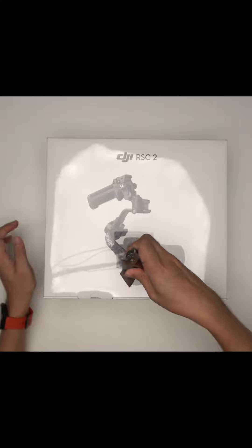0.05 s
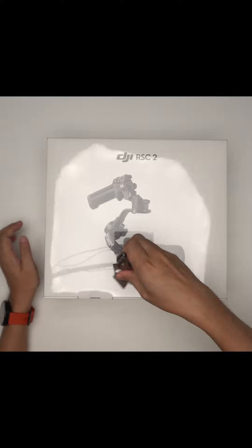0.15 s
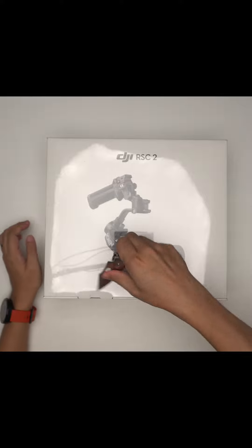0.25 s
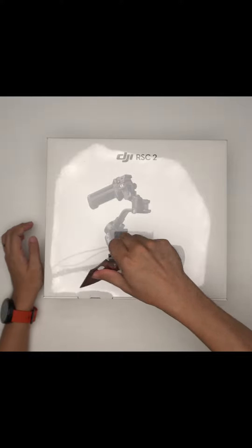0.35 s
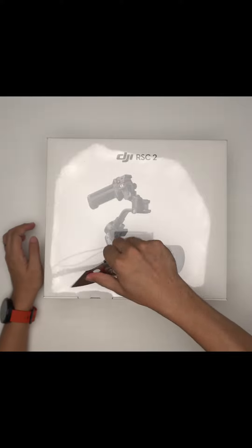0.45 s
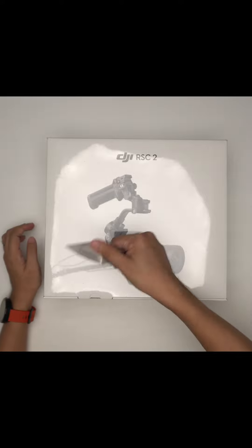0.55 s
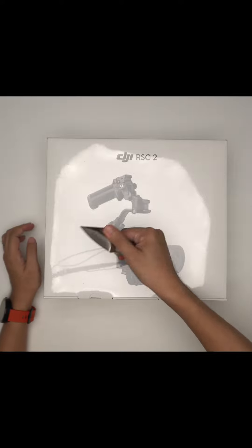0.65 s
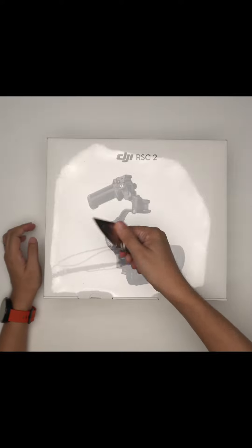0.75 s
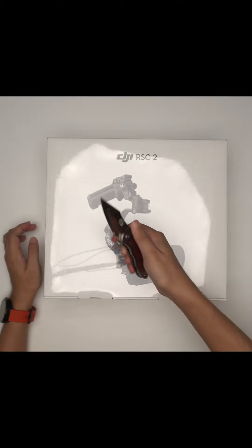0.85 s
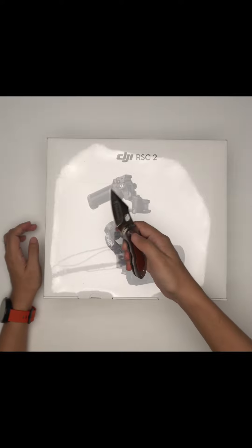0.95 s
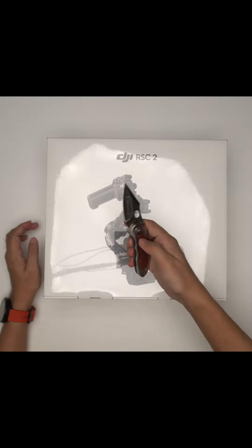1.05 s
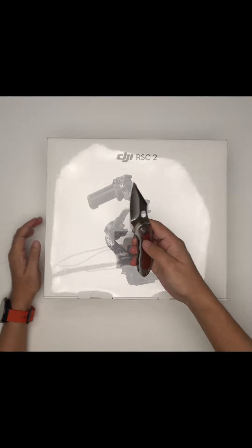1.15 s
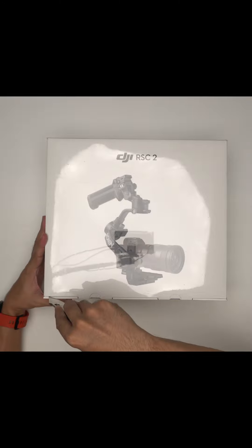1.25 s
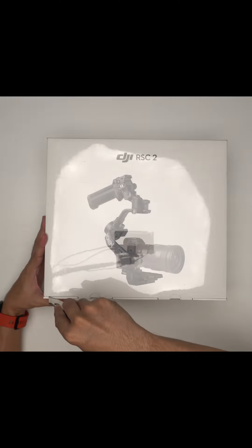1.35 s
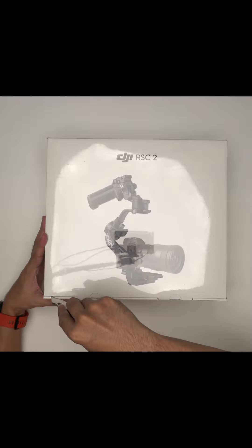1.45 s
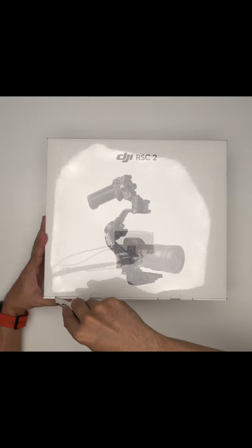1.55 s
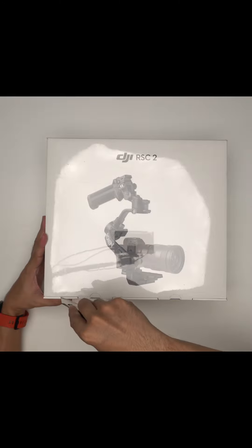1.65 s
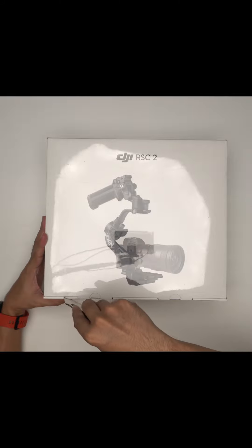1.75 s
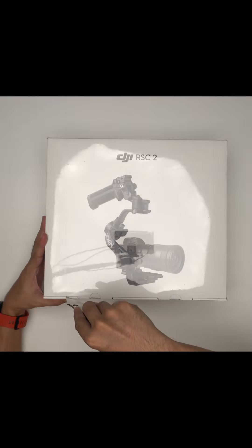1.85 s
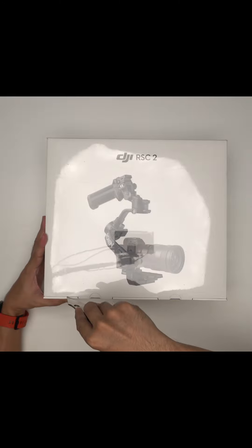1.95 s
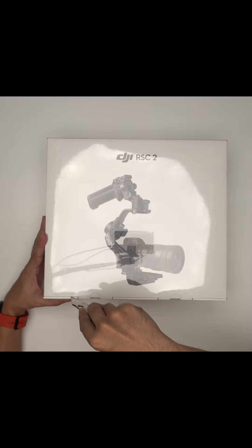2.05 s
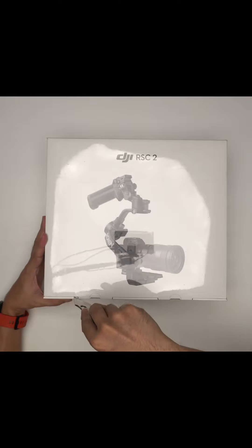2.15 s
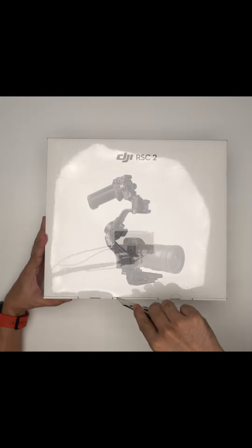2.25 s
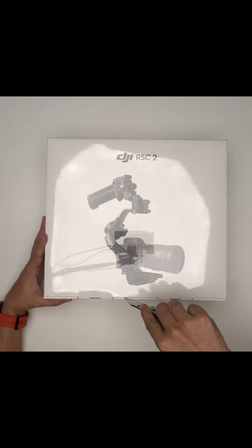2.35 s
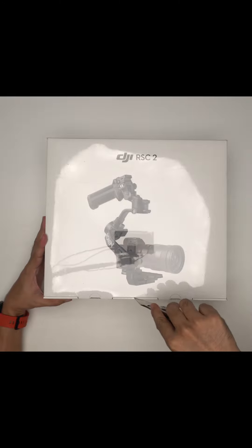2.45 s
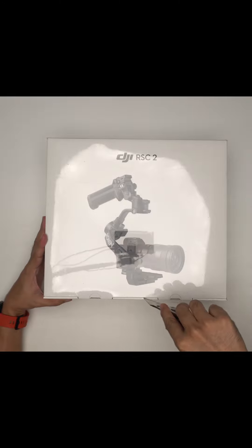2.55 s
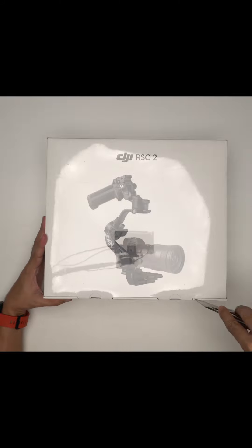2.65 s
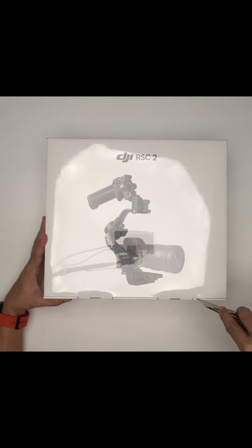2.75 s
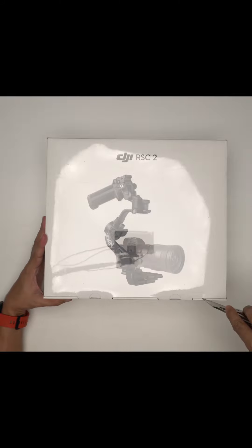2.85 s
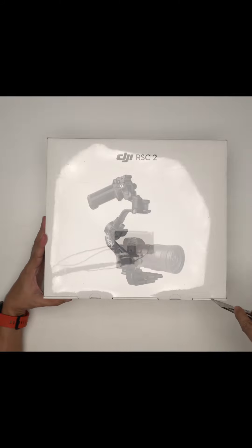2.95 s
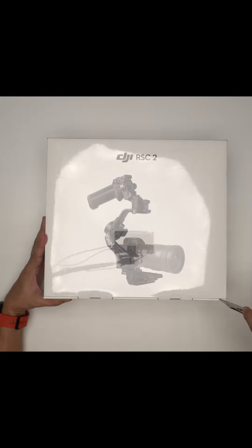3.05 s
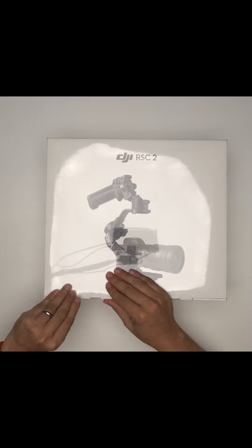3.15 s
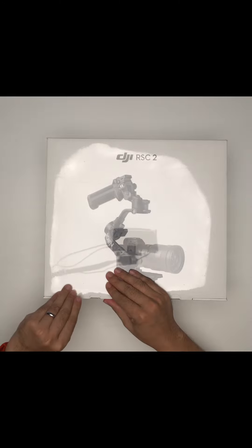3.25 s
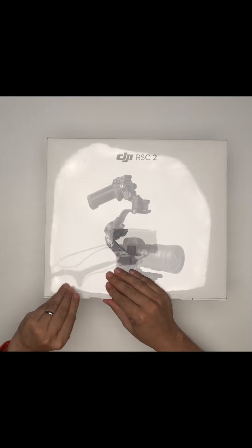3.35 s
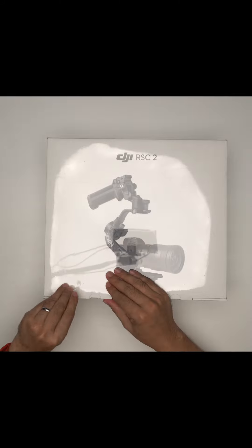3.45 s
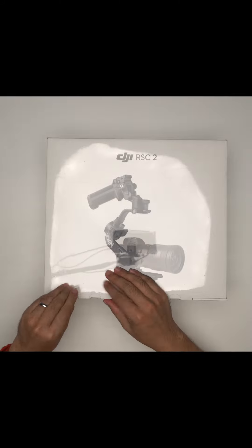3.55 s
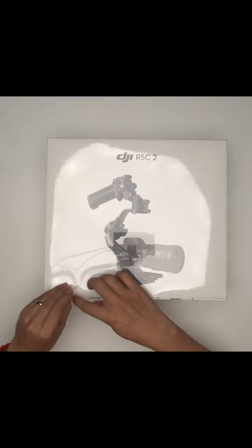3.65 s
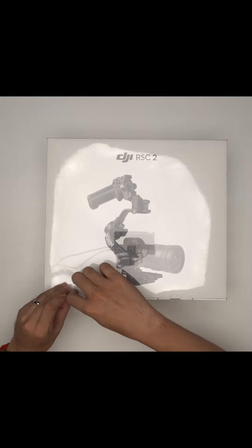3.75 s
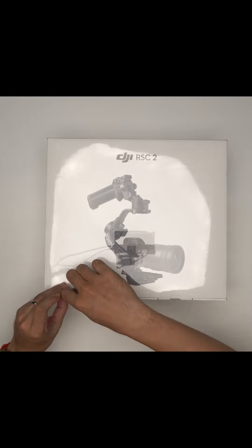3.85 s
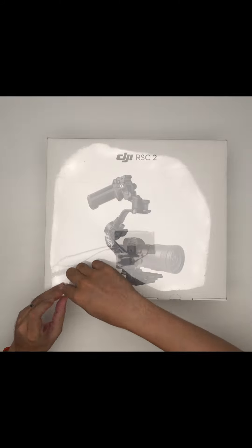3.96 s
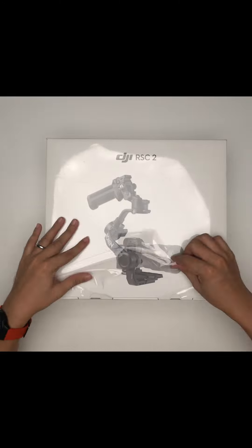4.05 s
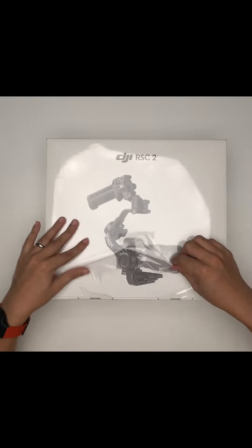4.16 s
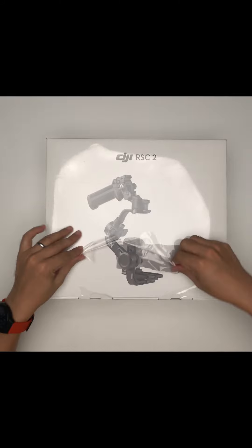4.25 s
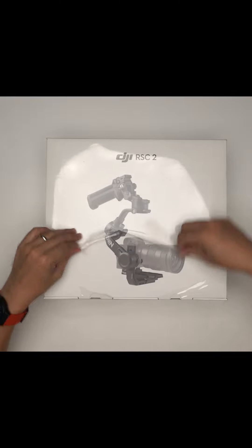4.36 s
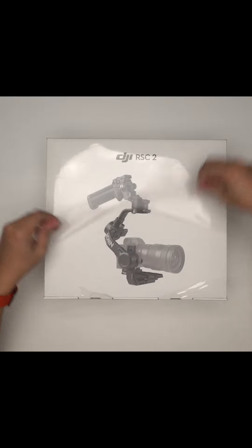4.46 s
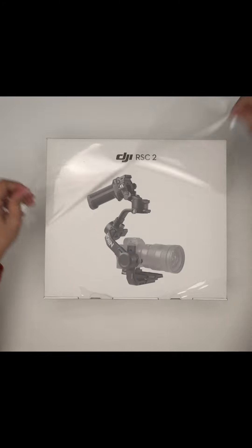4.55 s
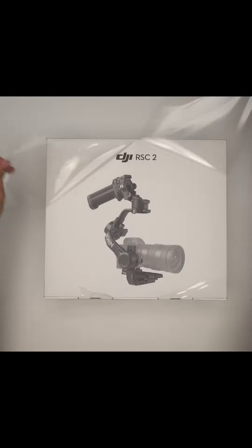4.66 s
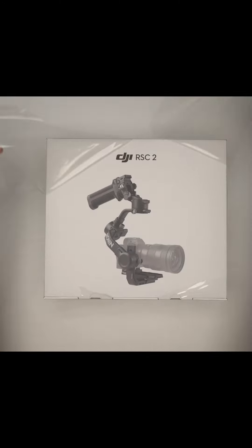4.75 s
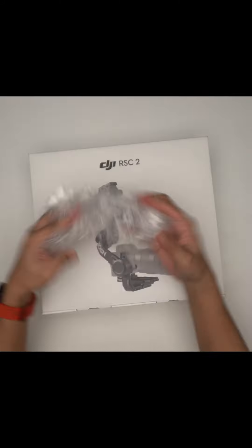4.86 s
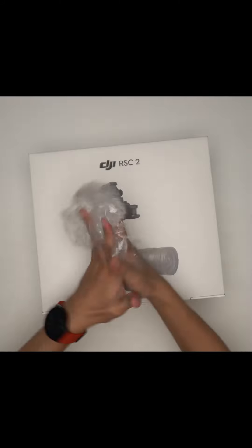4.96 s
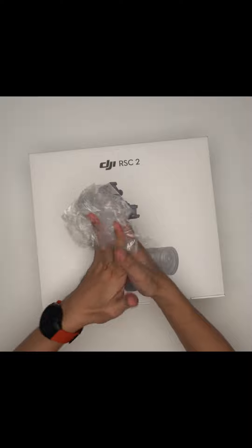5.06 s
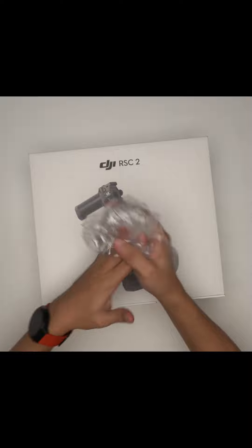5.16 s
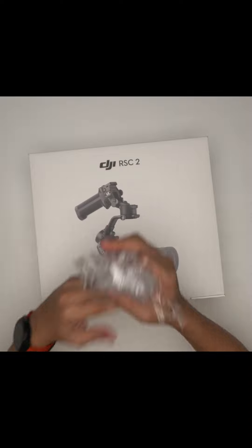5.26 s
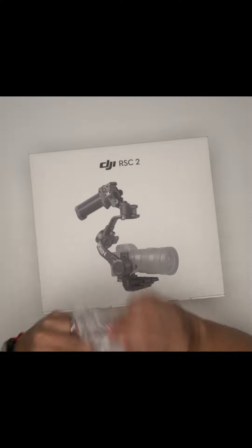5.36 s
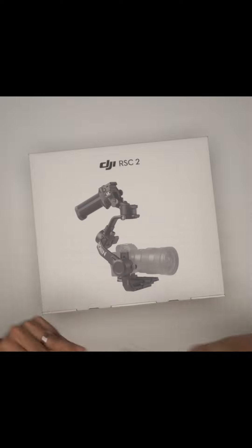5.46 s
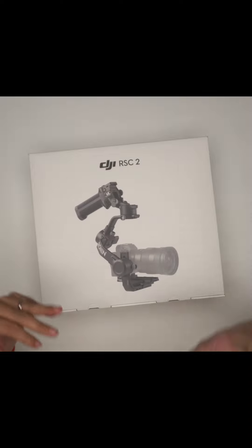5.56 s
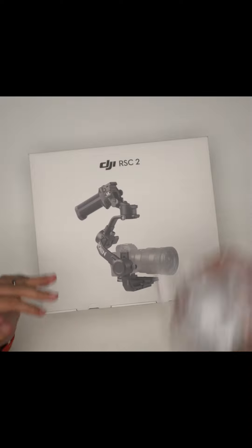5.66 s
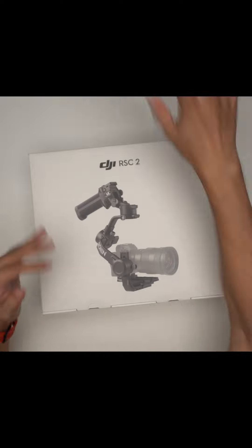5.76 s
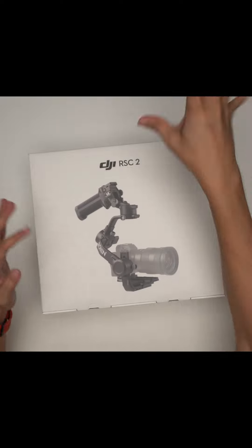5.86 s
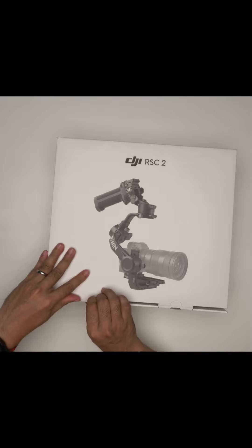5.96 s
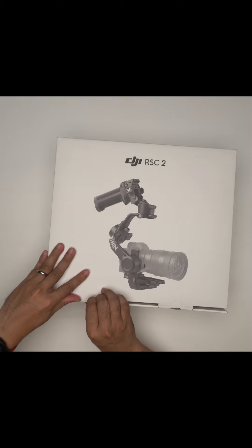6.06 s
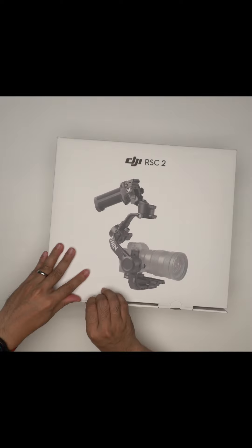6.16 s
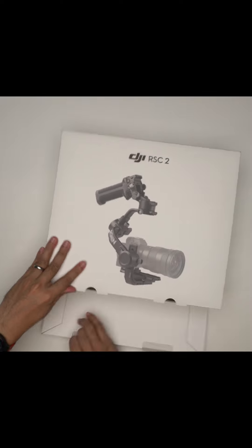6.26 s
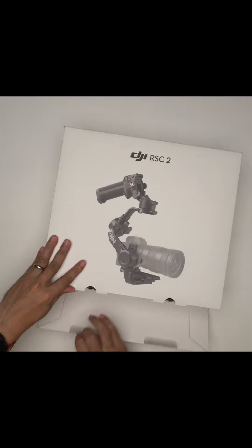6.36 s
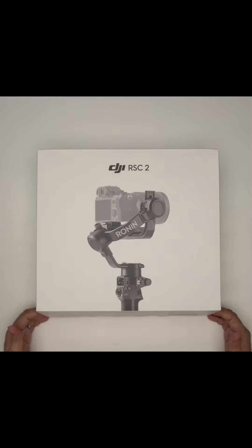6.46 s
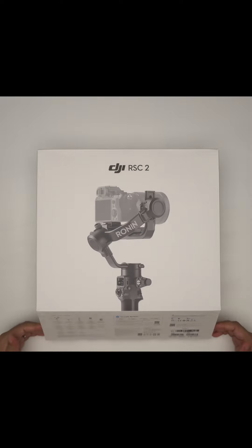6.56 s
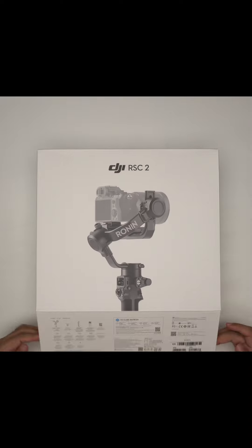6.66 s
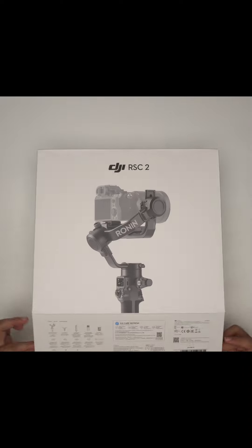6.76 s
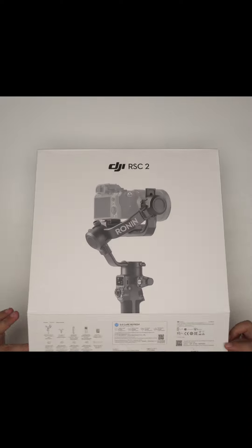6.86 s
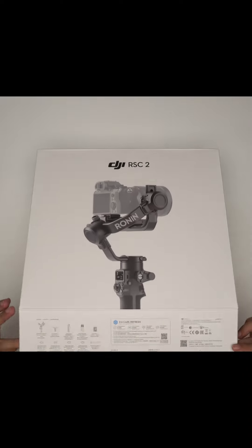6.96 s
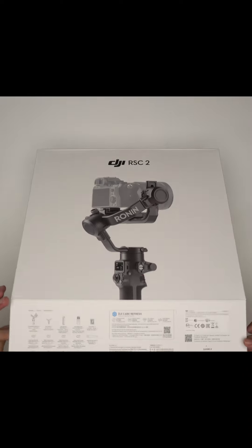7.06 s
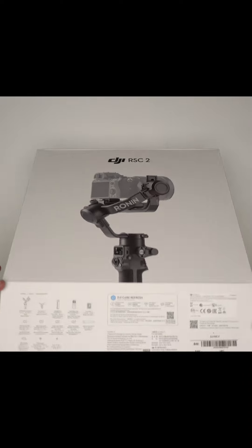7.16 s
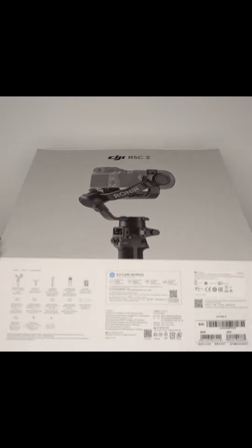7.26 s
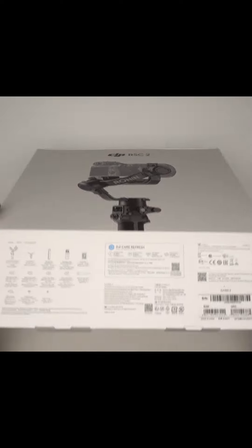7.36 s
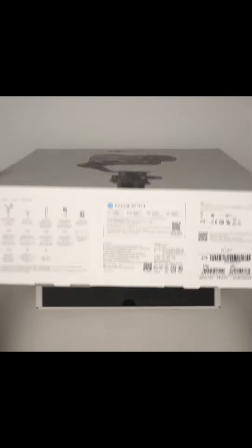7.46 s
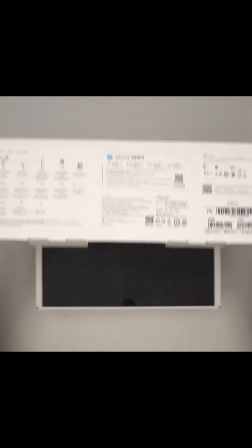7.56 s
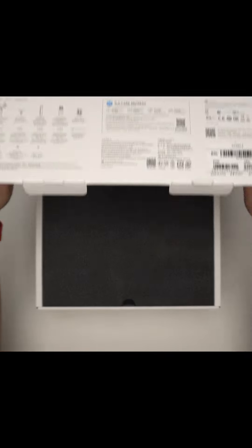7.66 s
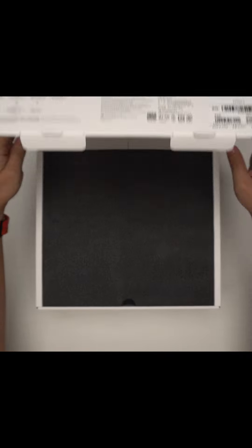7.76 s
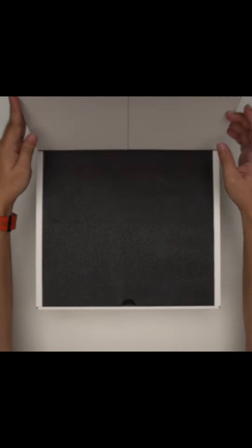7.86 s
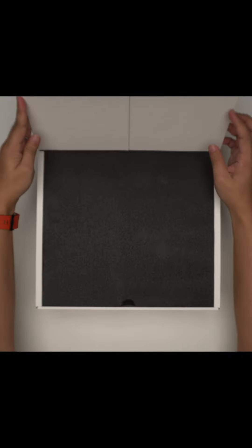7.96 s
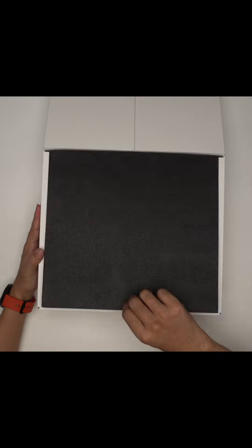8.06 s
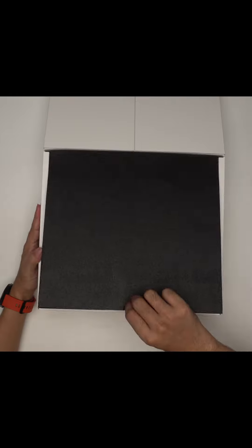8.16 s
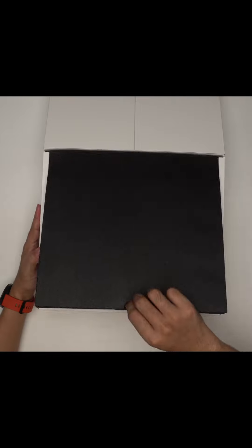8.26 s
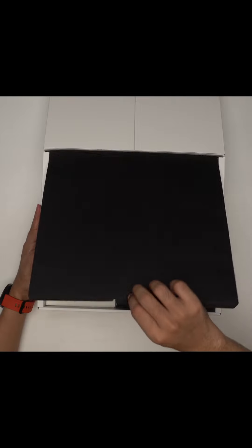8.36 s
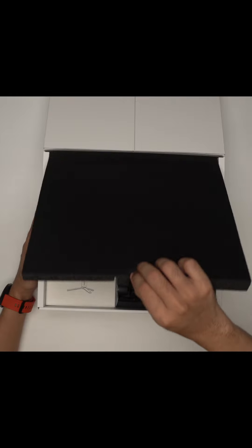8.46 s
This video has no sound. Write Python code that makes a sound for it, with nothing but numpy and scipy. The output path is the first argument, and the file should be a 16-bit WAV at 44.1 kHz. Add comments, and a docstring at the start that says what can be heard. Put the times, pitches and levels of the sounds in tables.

```python
"""A folding knife cracks open close over a shrink-wrapped carton on a table: a burst, then ringing steel modes.
Its blade slits the film, which is plucked, ripped and crumpled: noise snaps, clumped clicks, stick-slip pulses.
The carton knocks in damped panel modes, its flap scrapes open, the lid swings up and air swells at the microphone.
A quiet furnished room hums below, its reverberation stopping dead at three moments.
One small microphone hangs above and feeds both channels; each adds its own hiss."""
import sys
import numpy as np
from scipy import signal
from scipy.fft import rfft, irfft, next_fast_len
from scipy.io import wavfile

SR = 44100
rng = np.random.default_rng(int(sys.argv[2]) if len(sys.argv) > 2 else 0)


def materialize(psi):
    """Save the field psi as 16-bit PCM at rate SR to the path in sys.argv[1].

    A 1-D psi becomes a single channel; in a 2-D psi each row is a channel.
    """
    bounded = np.clip(np.atleast_2d(psi).T, -1, 1)
    quanta = np.round(bounded * 32767).astype(np.int16)
    wavfile.write(sys.argv[1], SR, quanta)


N = 375732

# Knife lock going home. Each row: start in seconds, level in dB, tilt of the steel modes in dB per octave.
KNIFE_LOCK = [(0.4487, -33.5, 4), (0.5448, -10, .3)]
# Ringing modes of the steel. Each row: frequency in Hz, level in dB, t60 in seconds.
STEEL_MODES = [(2246.4, -4, 0.033), (3176, -2.5, 0.024), (4000, -28, 0.019), (4600, 1.5, 0.016),
               (5450, -21.5, 0.011), (6250, 8.5, 0.015), (7680, -6, 0.0082), (8940, 4, 0.015),
               (9246, 3.5, 0.012), (10230, -5.5, 0.01522), (12400, 6, 0.0078), (12700, -7, 0.026),
               (15380, -23.5, 0.0058)]
# Single snaps of film and card. Each row: start in seconds, peak of the body in dB, centre in Hz,
# top edge in dB relative to the body.
SNAPS = [(1.9093, -42.5, 3560, 3), (2.215, -61, 2920, -12), (2.282, -48, 6900, -8), (2.373, -59, 2220, -13),
         (2.4089, -64, 2200, -14), (2.601, -59, 2210, -18), (2.6354, -62, 2200, -16),
         (2.7756, -51.5, 2220, -17), (2.9043, -56.5, 2060, -1), (3.3503, -40.5, 7800, -12),
         (3.3747, -32, 7500, -23), (3.4473, -38, 4790, -19), (3.6496, -50, 2260, -22),
         (4.1285, -37, 4990, -21), (4.15, -47, 1970, -19), (4.2505, -34.5, 2880, -10),
         (4.2773, -30.5, 3620, -16), (4.3322, -38, 4150, -23), (4.344, -35, 1570, -23),
         (4.37, -29, 3980, -10), (4.4088, -36, 4400, -24), (4.4331, -18, 3620, -35),
         (4.9097, -24, 3500, -19), (5.0123, -35, 3970, -20), (5.0449, -32, 3660, -26),
         (5.13, -39, 3060, -23), (5.1473, -35, 1860, -19), (5.1685, -27, 3370, -11),
         (5.1931, -25.5, 6450, 7), (5.2866, -45, 2520, -20), (5.3343, -24, 6300, -26),
         (5.3629, -26, 2320, -26), (5.4275, -26.5, 2150, -17), (5.5365, -23, 3880, -29),
         (5.6282, -28, 3130, -19), (5.7174, -51, 3670, -18), (5.7423, -43, 2260, -26),
         (5.8033, -26, 3880, -24), (5.8369, -33.5, 3400, -19), (5.859, -40, 3970, -17),
         (6.1709, -51.5, 3800, -19), (6.2356, -20.5, 2170, -24), (6.2502, -22.5, 3950, -20),
         (6.2771, -28.5, 1800, -26), (6.345, -29, 3040, -23), (6.3822, -39.5, 2450, -31),
         (7.3093, -48.5, 1550, -20), (7.4417, -53.5, 2460, -27), (8.3492, -57.5, 1650, -18)]
# Runs of stick-slip pulses in the tear, one overlapping another. Each row: start in seconds, length in seconds,
# first and last slips per second, bend of the glide (an exponent), level in dB.
TEAR_RUNS = [(4.42, 0.12, 781, 1280, 0.61, -44), (4.548, .047, 719, 809, 1.14, -40.5),
             (4.596, .163, 1100, 265, .74, -38), (4.668, .048, 1300, 1510, .6, -39),
             (4.7622, .052, 171.4, 233, 1.1, -41.5), (4.8179, 0.069, 259.2, 158.3, 1.3, -40.5)]
# Colour of the tear. Each row: frequency in Hz, relative gain in dB.
RIP_COLOUR = [(150, -5), (400, -1), (900, 2.5), (1450, -11.5), (2000, -25), (3900, -4.5), (9000, -5.5),
              (13000, -11), (16000, -4)]
# Crinkling film, one curve plucked before the tear, one balled up after it. Each row: time in seconds, level in dB.
CRINKLE_CURVES = [
    [(4.09, -64.5), (4.23, -65), (4.29, -49.5), (4.32, -69), (4.41, -52.5), (4.45, -34)],
    [(4.89, -42), (4.99, -38), (5.02, -50.5), (5.09, -56), (5.2, -39.5), (5.27, -44), (5.55, -47.5),
     (5.78, -50.5), (5.925, -58)],
]
# Loose film flapping behind the tear. Each row: time in seconds, level in dB.
FLUTTER_CURVE = [(4.44, -49.5), (4.52, -42.5), (4.56, -38.5), (4.7, -38.5), (4.765, -45), (4.9, -46)]
# Blade slitting the film along the edge. Each row: time in seconds, level in dB.
SLIT_CURVE = [(2.03, -95), (2.35, -77.5), (2.67, -75), (2.7, -90)]
# Colour of the film. Each row: frequency in Hz, relative gain in dB.
FILM_COLOUR = [(120, -33), (200, 1.5), (299, -11.5), (380, -2.5), (558, -5.5), (1180, -1.5), (4520, -3.5),
               (14900, -16), (16000, -11)]
# Flap scraping out of its slot. Each row: time in seconds, level in dB.
FLAP_CURVE = [(6.235, -20), (6.262, -47.5), (6.3, -48.5), (6.39, -52), (6.41, -60), (6.55, -81), (6.6, -99)]
# Colour of the card. Each row: frequency in Hz, relative gain in dB.
CARD_COLOUR = [(59, -41), (100, 0.5), (244, -2), (424, -12.5), (991, -12), (2170, -20), (2420, -20.5),
               (12400, -31.5), (16000, -42)]
# Knocks on the carton. Each row: start in seconds, peak in dB, reference frequency in Hz,
# fall in dB per octave away from it (negative: rise).
KNOCKS = [(1.907, -42.5, 267, 9.5), (2.767, -46.5, 300, 12), (3.374, -46.5, 196, -3), (3.958, -51, 700, 8),
          (4.177, -43.5, 770, 18), (4.978, -27.5, 198, 11), (5.796, -40, 410, 10), (6.172, -45, 373, 9),
          (6.236, -20.5, 785, 4), (6.243, -22.5, 125, 8), (6.278, -23, 250, -7), (6.329, -30.5, 220, 1),
          (7.308, -43.5, 330, 5), (7.44, -54, 171, -1), (8.372, -49, 208, 13)]
# Panel modes of the carton. Each row: frequency in Hz, level in dB, t60 in seconds.
CARTON_MODES = [(134.5, -15, 0.24), (181, -11.5, 0.15), (260, 0.5, 0.033), (365, 1.5, 0.046),
                (496, -3.5, 0.037), (640, -9, 0.032), (786, 5.5, 0.027), (958, 1.5, 0.071),
                (1240, 17.5, 0.023), (1690, -20, .02), (2350, -28, 0.017)]
# Fingers, blade and card sliding, and a few soft low bumps near the end. Each row: middle in seconds, length in
# seconds, level in dB, centre in Hz, # width in octaves.
RUBS = [(1.303, .066, -65, 3500, 2.5), (1.914, 0.018, -58.5, 2500, 3.5), (2.789, 0.042, -67.5, 900, 6.6),
        (2.987, .5, -81.5, 2570, 0.88), (3.394, 0.027, -43, 7100, 0.6), (3.399, 0.14, -68, 7000, 1.6),
        (3.643, .06, -69, 2490, 4.2), (3.842, .06, -73.5, 4300, 2.1), (3.909, .06, -68, 2200, 3.9),
        (4.052, 0.034, -69, 4970, 3.2), (4.297, 0.025, -43, 4650, 3.2), (4.334, 0.48, -58.5, 200, 3.2),
        (4.556, 0.094, -37, 7500, 0.86), (4.599, 0.17, -37.5, 4730, 1.7), (4.751, .5, -56, 99, 2.9),
        (4.984, .09, -36.5, 2780, 4.3), (5.809, 0.023, -44.5, 5870, 1.4), (6.06, .36, -77.5, 3870, 0.17),
        (6.3, 0.056, -52, 920, .58), (6.384, 0.021, -45, 1790, 1.4), (6.416, .12, -63, 2780, .4),
        (6.526, 0.077, -63, 1240, 2.3), (7.352, .18, -76.5, 3070, 1.65), (7.763, 0.37, -70.5, 4040, 0.86),
        (7.745, 0.14, -77, 6450, .3), (7.868, 0.098, -74, 6200, 0.33), (7.895, 0.031, -67.5, 5250, 1.7),
        (8.0, 0.24, -68.5, 302, 2.4), (8.05, 0.026, -59, 706, 0.88), (8.062, 0.13, -71.5, 4500, 1.6),
        (8.127, 0.068, -56.5, 6900, 9), (8.403, 0.085, -54, 228, 1.57), (8.439, 0.027, -57, 2160, 2.8),
        (8.464, 0.4, -72, 1760, 2.1)]
# Air pushed at the microphone by film, flap and lid. Each row: start in seconds, length in seconds, level in dB,
# swing in Hz.
AIR_SWINGS = [(4.723, .1, -46, 25.8), (4.974, 0.081, -55, 25), (5.762, 0.13, -54, 25.4),
              (6.281, 0.18, -37.5, 20), (6.444, 0.048, -35.5, 21), (7.945, .14, -53, 41.5)]
# Decay of the furnished room. Each row: frequency in Hz, t60 in seconds.
ROOM_T60 = [(200, 0.72), (2000, 0.66), (6000, 0.37), (14000, 0.15)]
# Moments when the reverberation stops dead. Each entry: time in seconds.
REVERB_STOPS = [4.091, 5.926, 6.496]
# Colour of the room tone. Each row: frequency in Hz, relative gain in dB.
ROOM_COLOUR = [(12, -46), (20, -8), (65, -2), (134, -17.5), (172, -8), (328, -19.5), (367, -25.5),
               (434, -17.5), (472, -23.5), (624, -24), (1480, -35), (1960, -35.5), (7110, -40),
               (8180, -38.5), (16000, -39)]

SNAP_MS = 1  # time constant of a snap's decay
LID_ECHO_MS, LID_ECHO = .35, .6  # delay, and share of the pulse sent back
JITTER_MS = .08  # rms straying of a slip in time
WAVER = .07  # rms share by which the slip rate wanders
CONTACT_MS = 1.26  # length of the soft push of a knock
WET_DB = -13.5  # reverberation under the direct sound
ROOM_DB, OWN_HISS_DB = -64, -88.5
WHINE_HZ, WHINE_DB = 8240, -91  # a thin faint band in the room tone
CUTOFF_HZ = 15750


def amp(db):
    """Turn dB into gain."""
    return 10 ** (np.asarray(db) / 20)


def unit(x):
    """Scale to rms 1."""
    return x / np.sqrt(np.mean(x ** 2) + 1e-20)


def add(out, s, x):
    """Mix x into out from second s."""
    i = max(round(s * SR), 0)
    out[i:i + len(x)] += x[:N - i]


def along(rows):
    """Draw a table's columns sample by sample, from first to last row."""
    s, *columns = np.transpose(rows)
    times = np.arange(s[0], s[-1], 1 / SR)
    return [np.interp(times, s, column) for column in columns]


def at_hz(points, hz):
    """Read a table on a log-frequency axis."""
    table = np.array(points)
    return np.interp(np.log(hz), np.log(table[:, 0]), table[:, 1])


def colour(x, spectrum):
    """Filter x by a table of gains in dB."""
    n = next_fast_len(len(x))
    hz = np.arange(n // 2 + 1) * SR / n + 1  # 1 Hz up, to keep the log finite
    return irfft(rfft(x, n) * amp(at_hz(spectrum, hz)), n)[:len(x)]


def band(x, hz, octaves):
    """Pass a broad band around hz."""
    edges = np.clip([hz * 2 ** (-octaves / 2), hz * 2 ** (octaves / 2)], 10, .45 * SR)
    return signal.lfilter(*signal.butter(1, edges, "band", fs=SR), x)


def strike(modes, push, spread_db):
    """One blow rings every mode, each with a random strength of its own; peak 1."""
    t = np.arange(SR // 5) / SR
    hz, db, t60 = np.transpose(modes)[:, :, None]
    strength_db = db + rng.normal(0, spread_db, db.shape)
    rings = amp(strength_db - 60 * t / t60) * np.sin(2 * np.pi * hz * t)
    hit = np.convolve(rings.sum(axis=0), push)
    return hit / np.abs(hit).max()


def knife():
    """The lock cracks home and its steel rings briefly; so small a part radiates little bass."""
    out, t = np.zeros(N), np.arange(400) / SR
    for s, db, tilt in KNIFE_LOCK:
        modes = [(hz, level + tilt * np.log2(hz / 6000), t60) for hz, level, t60 in STEEL_MODES]
        burst = rng.standard_normal(len(t)) * t * np.exp(-t / .00045)
        crack = band(burst, 5500, octaves=1.6)
        add(out, s, amp(db - 1.0 - tilt) * crack / np.abs(crack).max())
        add(out, s + 0.00064, amp(db) * strike(modes, [1], spread_db=3.0))
    return signal.sosfilt(signal.butter(3, 2300, "high", fs=SR, output="sos"), out)


def snaps():
    """Each snap is a dying spit of noise around its own pitch, with a brittle top edge."""
    out, t = np.zeros(N), np.arange(600) / SR
    for s, db, hz, top_db in SNAPS:
        spit = rng.standard_normal(len(t)) * np.exp(-1000 * t / SNAP_MS)
        body = band(spit, hz, octaves=1.14)
        top = band(band(spit, 12200, octaves=1.0), 12200, octaves=1.0)
        add(out, s, amp(db) * (body / np.abs(body).max() + amp(top_db) * top / np.abs(top).max()))
    return out


def tear(s, length, first, last, bend, db):
    """Stick and slip: one sharp pulse per slip, which the lid below sends back inverted a moment later."""
    n = round(length * SR)
    per_s = first * (last / first) ** (np.linspace(0, 1, n) ** bend)
    per_s = per_s * (1 + WAVER * unit(band(rng.standard_normal(n), 50, octaves=2)))
    wobble = unit(signal.lfilter([1], [1, -.98], rng.standard_normal(n)))
    # a slip falls wherever the jittered count passes a new whole number
    count = np.cumsum(per_s) / SR + JITTER_MS / 1000 * per_s * wobble
    slips = np.diff(np.maximum.accumulate(np.floor(count)), prepend=0) > 0
    pulses = slips * amp(rng.normal(0, 1.5, n)) * np.sqrt(SR / per_s)
    echo = np.zeros(40)
    echo[[0, round(LID_ECHO_MS * SR / 1000)]] = 1, -LID_ECHO
    rip = unit(colour(np.convolve(pulses, echo)[:n], RIP_COLOUR))
    out = np.zeros(N)
    add(out, s, amp(db) * signal.windows.tukey(n, .12) * rip)
    return out


def creases(curve, spectrum, per_s, tilt, brighter, size_db, hiss_db, clump_db):
    """Creases buckle in clumps, each with its own size and pitch, over the blur of countless small ones."""
    db, = along(curve)
    n, pitches = len(db), np.geomspace(300, 14000, 12)
    clumps = unit(band(rng.standard_normal(n), 25, octaves=3))
    sizes = amp(size_db * np.minimum(rng.exponential(1, n), 2.9)) * rng.choice([-1, 1], n)
    buckles = rng.random(n) < per_s * amp(clump_db * clumps) / SR
    clicks = unit(sizes * buckles)
    dealt = rng.integers(0, len(pitches) + 2, n)
    hiss, sheet = rng.standard_normal((2, n)), 0
    slope = tilt + brighter * (db - db.mean())  # dB per octave, moving with the level
    for k, hz in enumerate(pitches):
        # a crease spans neighbouring pitches
        mine = clicks * (np.abs(dealt - k) < 2) + amp(hiss_db) * hiss[k % 2]
        # the colour shifts as the sheet folds
        patch = clump_db * unit(band(hiss[1 - k % 2][::-1], 6 + k, octaves=2.3)) / 2
        gain = amp(patch + slope * np.log2(hz / 3500))
        sheet = sheet + gain * band(mine, hz, octaves=0.75) * (-1) ** k
    out = np.zeros(N)
    add(out, curve[0][0], amp(db) * unit(colour(sheet, spectrum)))
    return out


def film():
    """Everything the wrap does between single snaps: crinkling, flapping, slitting and tearing."""
    crinkle = sum(creases(curve, FILM_COLOUR, per_s=400, tilt=1.18, brighter=0.097,
                          size_db=1.0, hiss_db=-9.0, clump_db=4.5) for curve in CRINKLE_CURVES)
    flutter = creases(FLUTTER_CURVE, FILM_COLOUR, per_s=3500, tilt=3.0, brighter=.06,
                      size_db=-2.5, hiss_db=-2.5, clump_db=3.0)
    slit = creases(SLIT_CURVE, FILM_COLOUR, per_s=250, tilt=-7.0, brighter=0,
                   size_db=3.0, hiss_db=-6.0, clump_db=4.0)
    return crinkle + flutter + slit + sum(tear(*run) for run in TEAR_RUNS)


def flap():
    """The card flap scrapes out of its slot in dense, clumped clicks and hiss."""
    return creases(FLAP_CURVE, CARD_COLOUR, per_s=1800, tilt=-0.73, brighter=-0.011,
                   size_db=-3.0, hiss_db=-2.0, clump_db=7.5)


def carton():
    """Soft contacts ring the panels; where the blow lands weights the modes by distance from one pitch."""
    out, push = np.zeros(N), np.hanning(round(CONTACT_MS * SR / 1000) + 2)
    for s, db, reference_hz, fall_db in KNOCKS:
        heard = [(hz, level - fall_db * abs(np.log2(hz / reference_hz)), t60)
                 for hz, level, t60 in CARTON_MODES]
        add(out, s, amp(db) * strike(heard, push, spread_db=4.0))
    return out


def rubs():
    """Fingers, blade and card slide, and a few soft low bumps land: band noise that swells and fades."""
    out = np.zeros(N)
    for s, length, db, hz, octaves in RUBS:
        grit, catch = rng.standard_normal((2, SR))[:, :round(length * SR)]
        grit = grit * amp(2.0 * unit(band(catch, 60, octaves=11.0)))  # the surfaces catch unevenly
        rub = unit(band(band(grit, hz, octaves), hz, octaves))
        add(out, s - length / 2, amp(db) * np.hanning(len(grit)) * rub)
    return out


def air():
    """Slow pressure swings at the edge of hearing push at the microphone, each swelling and fading."""
    out = np.zeros(N)
    for s, length, db, hz in AIR_SWINGS:
        t = np.arange(round(length * SR)) / SR
        swing = np.sqrt(2) * np.sin(2 * np.pi * hz * t)
        add(out, s, amp(db) * swing * signal.windows.tukey(len(t), .6))
    return out


def tail():
    """Room response: noise dying band by band, fading in over the first moments; energy 1."""
    t, out = np.arange(SR * 3 // 5) / SR, 0
    for hz in np.geomspace(100, 13000, 8):
        noise = band(rng.standard_normal(len(t)), hz, octaves=1)
        out = out + noise * amp(-60 * t / at_hz(ROOM_T60, hz))
    out = out * (1 - np.exp(-(t / 0.0015) ** 2))
    return out / np.sqrt(np.sum(out ** 2))


def room(x):
    """The room reverberates; at each stop the tail ends dead and starts afresh."""
    out, response = np.zeros(N), tail()
    edges = [0] + [round(s * SR) for s in REVERB_STOPS] + [N]
    for a, b in zip(edges, edges[1:]):
        out[a:b] = signal.fftconvolve(x[a:b], response)[:b - a]
    return out


def room_tone():
    """Steady hum and hiss of the quiet room: coloured noise with a thin high band."""
    hum, thin = rng.standard_normal((2, N))
    whine = band(band(thin, WHINE_HZ, octaves=0.071), WHINE_HZ, octaves=0.071)
    return amp(ROOM_DB) * unit(colour(hum, ROOM_COLOUR)) + amp(WHINE_DB) * unit(whine)


def scene():
    """One microphone feeds both channels; only their own electronic hiss differs."""
    direct = knife() + snaps() + film() + flap() + carton() + rubs()
    heard = direct + amp(WET_DB) * room(direct) + air() + room_tone()
    return heard + amp(OWN_HISS_DB) * rng.standard_normal((2, N))


def record(dry):
    """The top is cut steeply by an elliptic low-pass."""
    return signal.sosfilt(signal.ellip(12, .1, 70, CUTOFF_HZ, fs=SR, output="sos"), dry)


dry = scene()
out = record(dry)
materialize(out)
```